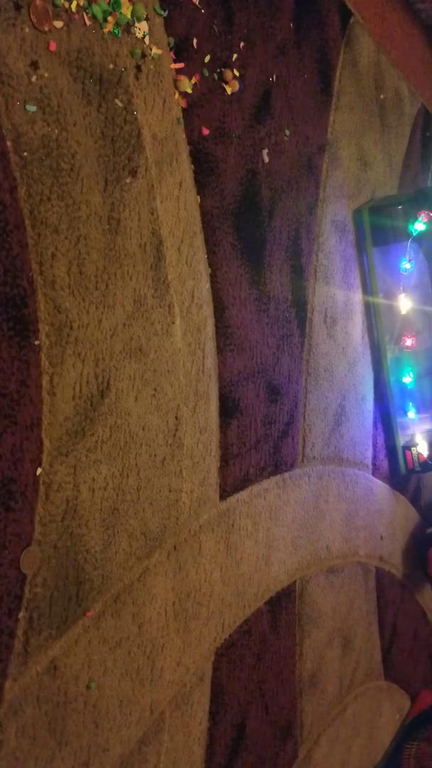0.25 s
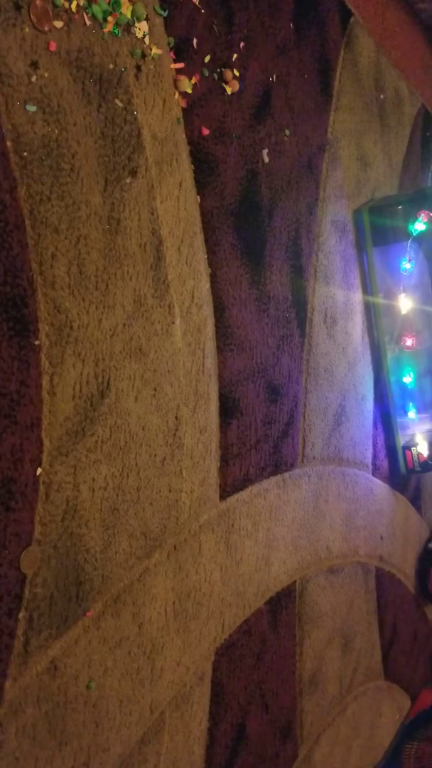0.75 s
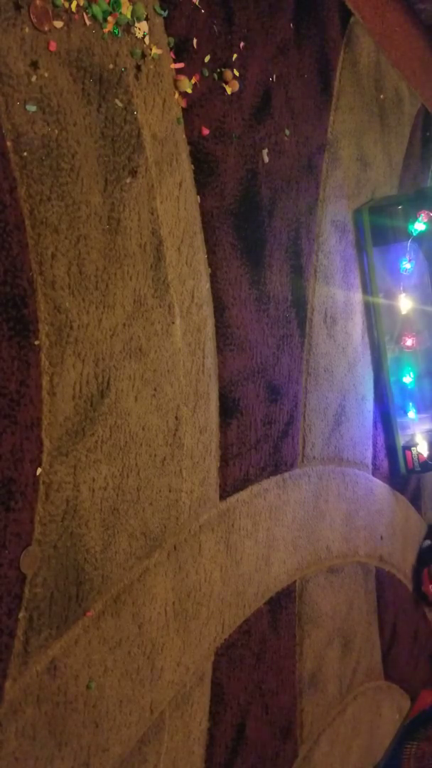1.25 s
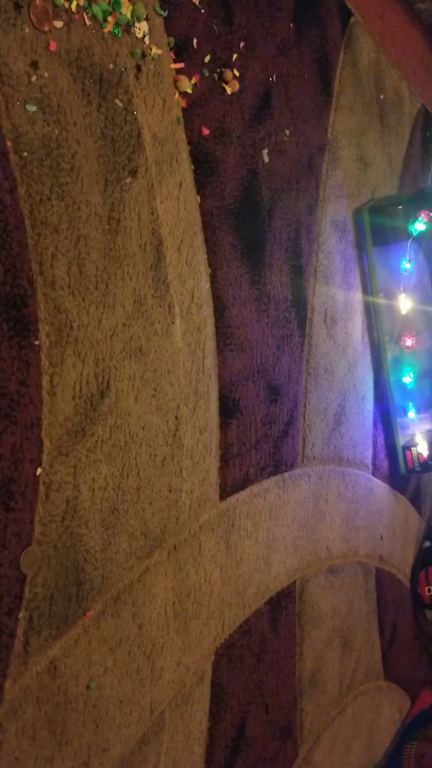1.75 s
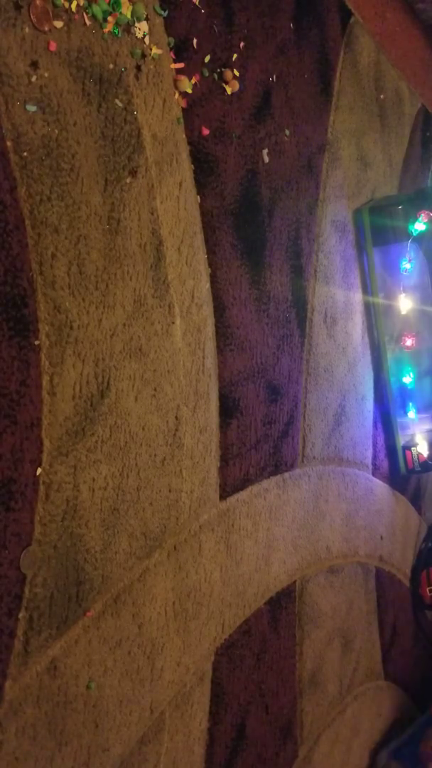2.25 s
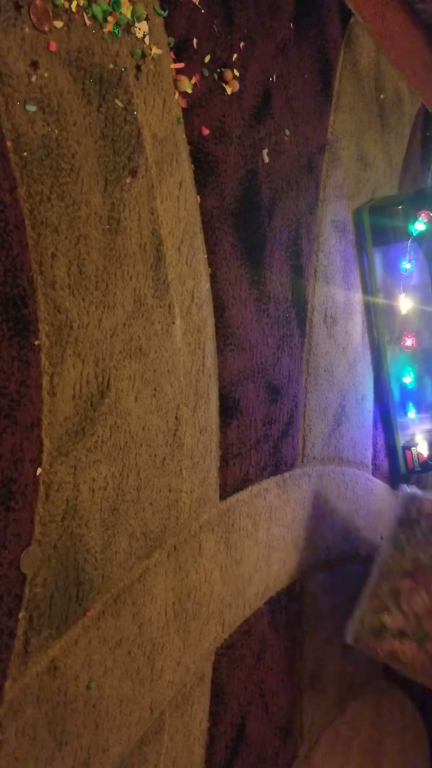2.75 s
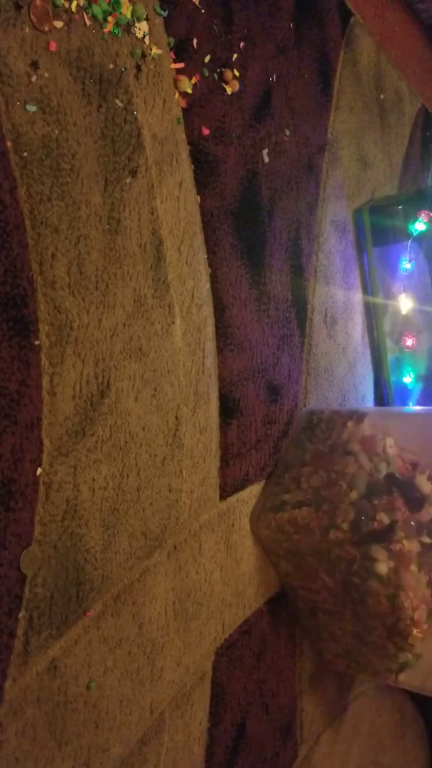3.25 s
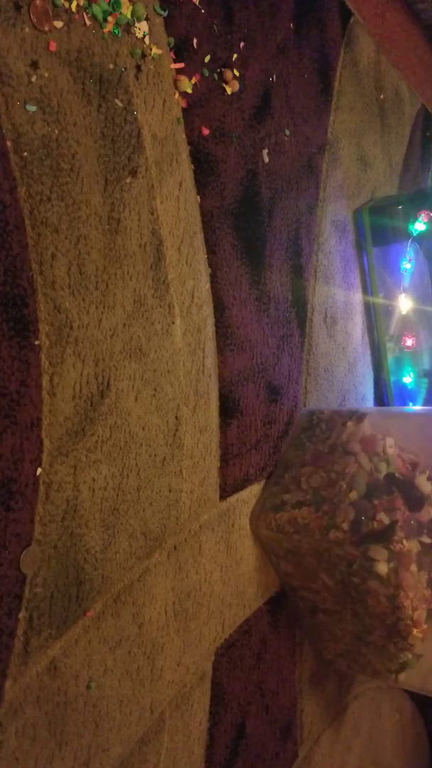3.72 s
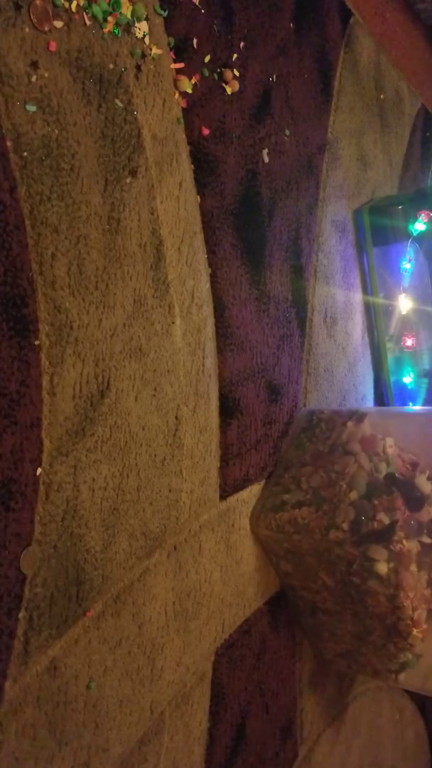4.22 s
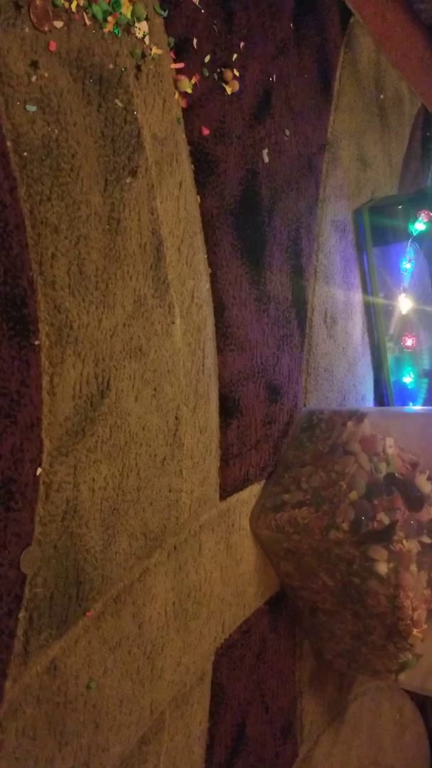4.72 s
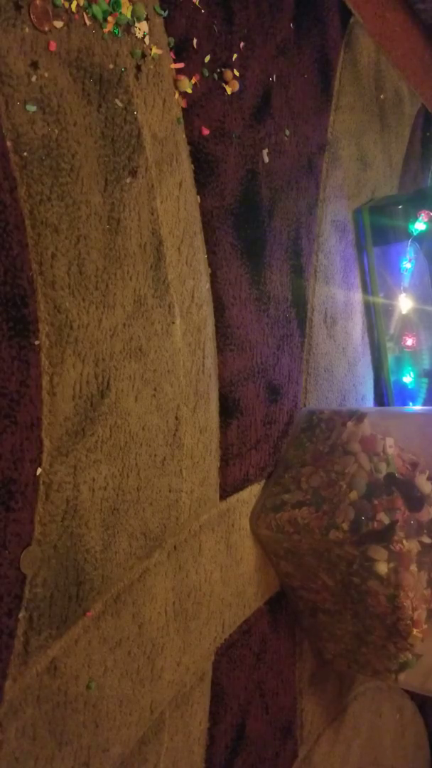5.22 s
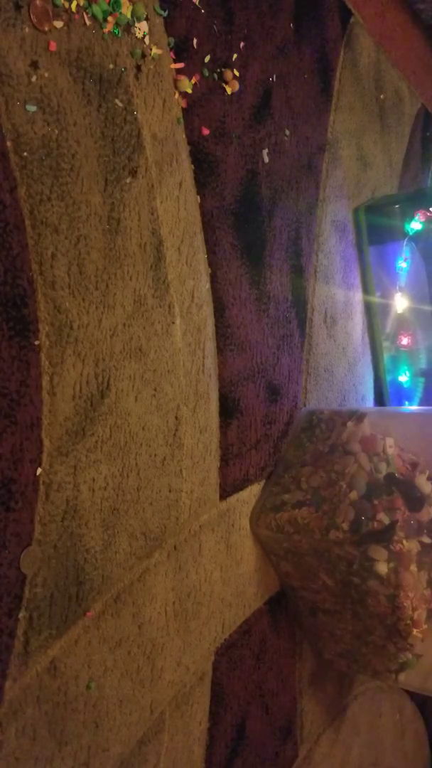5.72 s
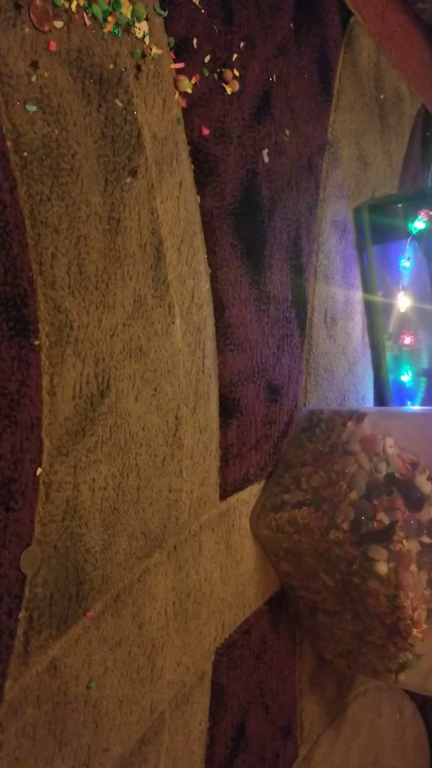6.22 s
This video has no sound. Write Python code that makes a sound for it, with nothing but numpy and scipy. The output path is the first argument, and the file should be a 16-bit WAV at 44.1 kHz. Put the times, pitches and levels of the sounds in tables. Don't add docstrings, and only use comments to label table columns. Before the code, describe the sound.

A hand vacuum has just been switched off in a small, soft room, heard closely. At 0 s a turbulent roar with hiss and a clear blade whine starts strong, then sinks in pitch and level; thinner, higher motor whines slide down with it, fading out around 3 s. Plastic knocks click at about 0.9 and 1.2 s, a dull carpet thud lands at 1.45 s, and a firmer knock comes at 2.06 s. A soft low bump at 3.07 s marks the vacuum coming to rest. Near-quiet follows, with faint low building rumble. Hollow finger taps occur at 4.3 and 4.7 s, then a sharp bright plastic clack at 5.33 s and more small taps. From 6.05 s crumbs patter and slide; from 6.18 s to the end near 6.45 s they burst into loud, dense crackles, pings and hollow knocks, with brief ringing.

```python
import sys
import numpy as np
from scipy import signal
from scipy.fft import rfft, irfft
from scipy.io import wavfile

SR = 44100
rng = np.random.default_rng(int(sys.argv[2]) if len(sys.argv) > 2 else 0)


def file_out(sig):
    cols = np.atleast_2d(sig).T
    lim = np.clip(cols, -1, 1)
    pcm = np.round(lim * 32767).astype(np.int16)
    wavfile.write(sys.argv[1], SR, pcm)


def makeup_ratio(level_db):
    decades = np.asarray(level_db, float) / 20
    return 10 ** decades


N = 285327
TIME = np.arange(N) / SR


def rms_one(x):
    return x / np.sqrt(np.mean(x ** 2) + 1e-20)


def in_time(rows):
    s, *columns = np.transpose(rows)
    return [np.interp(TIME, s, column) for column in columns]


def at_hz(points, hz):
    return np.interp(np.log(hz), np.log(np.array(points)[:, 0]), np.array(points)[:, 1])


def drift(rate):
    r = np.exp(-80 * np.pi * rate / SR)
    slow = signal.lfilter([1], [1, -2 * r, r * r], rng.standard_normal(N // 40 + 2002))
    slow = slow[2000:]
    return np.interp(np.arange(N) / 40, np.arange(len(slow)), rms_one(slow))


def coloured(spectrum):
    hz = np.maximum(np.fft.rfftfreq(N, 1 / SR), 1)
    inside = (hz > spectrum[0][0]) & (hz < spectrum[-1][0])
    noise = rfft(rng.standard_normal(N))
    return rms_one(irfft(noise * makeup_ratio(at_hz(spectrum, hz)) * inside, N))


def ring(clicks, hz, t60):
    r, w = makeup_ratio(-60 / (t60 * SR)), 2 * np.pi * hz / SR
    return signal.lfilter([0, np.sin(w)], [1, -2 * r * np.cos(w), r * r], clicks + 1e-18)


def grains(per_s, spread_db):
    sizes = makeup_ratio(spread_db * np.minimum(rng.exponential(1, N), 3.5))
    sizes = sizes * rng.choice([-1, 1], N)
    return rms_one(sizes * (rng.random(N) < per_s / SR))


# (frequency [Hz], density [dB per Hz])
RUMBLE_SPECTRUM = [(13, -62), (22, -9), (38, -6), (92, 0), (121, -8.5), (159, -8), (227, -21.5), (306, -27),
                   (382, -29), (426, -33), (737, -46.5), (801, -47), (1140, -55.5), (4510, -64.5),
                   (7000, -68.5), (9000, -64.5), (11000, -67.5), (13000, -65), (16400, -67)]
# (time [s], level [dB])
RUMBLE_COURSE = [
    (0, -41),
    (1.7, -44),
    (3.3, -37.5),
    (4.3, -36),
    (4.74, -33.5),
    (5.4, -36),
    (6.47, -34.5),
]
# (frequency [Hz], width [Hz], level against the rumble [dB])
ROOM_MODES = [(54.6, 5.2, -6.5), (91.7, 4, -4)]
# (frequency [Hz], level [dB])
FAR_HUM = [(791, -73)]


def background():
    out = coloured(RUMBLE_SPECTRUM)
    for hz, width, db in ROOM_MODES:
        mode = ring(rng.standard_normal(N), hz, 2.2 / width)
        out += makeup_ratio(db) * rms_one(mode)
    out *= makeup_ratio(in_time(RUMBLE_COURSE)[0] - 1.5 + 0.54 * drift(2.6))
    for hz, db in FAR_HUM:
        out += makeup_ratio(db + 1.2 * drift(3.0)) * np.sin(2 * np.pi * hz * TIME)
    return out


START_TURNS = 273.5
FRICTION, DRAG = 49.3, 18.8
DRAG_POWER = 1.5


def coasting():
    turns = [START_TURNS]
    for _ in range(N // 441):
        braking = FRICTION + DRAG * (turns[-1] / 100) ** DRAG_POWER
        turns.append(max(turns[-1] - braking / 100, 10))
    return np.interp(TIME, np.arange(len(turns)) / 100, turns)


# (start level [dB], loss [dB per dB of speed], extra loss [dB per dB squared])
AIR_LAWS = [
    (-35, 1.0, 0.035),
    (-23.5, 1.68, 0.03),
    (-21.5, 1.3, 0.2),
    (-36.5, 2.5, .001),
    (-63.5, 2.5, -0.1),
]
# (frequency [Hz], density [dB per Hz])
LOW_ROAR_SPECTRUM = [(82, -30), (140, -7.5), (188, -10.5), (241, -1.5), (338, -2), (372, -7.5), (430, -3),
                     (560, -21), (950, -120)]
# (frequency [Hz], density [dB per Hz])
ROAR_SPECTRUM = [(240, -29.5), (400, -17.5), (437, -4.5), (500, -2), (596, -3.5), (690, -7), (855, -15),
                 (930, -16), (981, -20), (1070, -31.5), (1180, -23), (1300, -35), (1690, -66.5),
                 (2860, -120)]
# (frequency [Hz], density [dB per Hz])
OUTLET_SPECTRUM = [(540, -30), (610, -6), (665, -1), (730, -6), (790, -21.5), (880, -24.5), (950, -15.5),
                   (1010, -24), (1100, -45.5)]
# (frequency [Hz], density [dB per Hz])
HISS_SPECTRUM = [(590, -38.5), (1000, 1.5), (1070, -7), (1170, -10), (1410, -10), (1900, -6), (2070, -18),
                 (2460, -8.5), (2840, -13.5), (4480, -24.5), (5840, -29), (6800, -46), (8840, -74),
                 (15000, -120)]
# (frequency [Hz], density [dB per Hz])
THIN_HISS_SPECTRUM = [(3820, -23), (6500, -4), (8060, -12), (15100, -24.5), (16000, -25)]
# (frequency [Hz], level [dB])
DUCT_RESPONSE = [(1100, -88), (1380, -68.5), (1480, -45.5), (1620, -40.5), (1760, -39), (1860, -29.5),
                 (1930, -38.5), (2230, -47), (2460, -31)]
# (time [s], level [dB])
BRUSH_CONTACT = [
    (0, -60),
    (.4, -77),
    (.75, -78),
    (1, -72),
    (2.2, -70),
    (2.5, -73),
    (2.75, -80),
    (2.9, -85),
    (3.03, -88),
    (3.1, -105),
]
# (order [cycles per turn], level [dB])
COMMUTATOR_ORDERS = [(24, 6.5), (36, -5), (48, 0.5), (60, -15.5), (72, -6), (84, -21), (96, -4), (108, -27),
                     (120, -8), (132, -16), (144, -8), (168, -17)]
# (frequency [Hz], level [dB])
CASING_RESPONSE = [(1500, -9), (1950, -1), (2200, 5), (2700, -1.5), (3500, -4.5), (4100, 1.5), (4400, 9),
                   (5200, 5), (5900, 3), (6300, -10.5), (6900, -17.5), (12000, -37)]
BLADES = 9
UNBALANCE_DB = -5
STOP_S = 3.3
OVERTONE_DB, OVERTONE_HZ, OVERTONE_OCTAVES = -59, 3300, 0.2


def motor():
    turns = coasting()
    slowed_db = 20 * np.log10(START_TURNS / turns)
    levels = [db - law * slowed_db - bend * slowed_db ** 2 for db, law, bend in AIR_LAWS]
    low_db, roar_db, outlet_db, hiss_db, thin_db = levels
    angle = 2 * np.pi * np.cumsum(turns) / SR

    low = coloured(LOW_ROAR_SPECTRUM) + makeup_ratio(UNBALANCE_DB) * np.sin(angle)
    roar = coloured(ROAR_SPECTRUM) + makeup_ratio(outlet_db - roar_db) * coloured(OUTLET_SPECTRUM)
    hiss = makeup_ratio(hiss_db) * coloured(HISS_SPECTRUM) + makeup_ratio(thin_db) * coloured(THIN_HISS_SPECTRUM)
    air = makeup_ratio(low_db + 1.9 * drift(17.0)) * low
    air += makeup_ratio(roar_db + 0.8 * drift(9.0)) * roar
    air += makeup_ratio(drift(9.9)) * hiss

    blade_hz = BLADES * turns
    blade_db = at_hz(DUCT_RESPONSE, blade_hz)
    blade_db = blade_db + 40 * np.log10(np.minimum(blade_hz / DUCT_RESPONSE[0][0], 1))
    overtone_db = OVERTONE_DB - (np.log2(2 * blade_hz / OVERTONE_HZ) / OVERTONE_OCTAVES) ** 2
    tones = makeup_ratio(blade_db + 2.5 * drift(28.0)) * np.sin(BLADES * angle + 0.3 * drift(40.0))
    tones += makeup_ratio(overtone_db + 3 * drift(20.0)) * np.sin(2 * BLADES * angle + 0.5 * drift(40.0))

    on = slice(int(STOP_S * SR))
    brush_db, = in_time(BRUSH_CONTACT)
    for order, db in COMMUTATOR_ORDERS:
        hz = order * turns[on]
        level_db = brush_db[on] + db + at_hz(CASING_RESPONSE, hz) + 2.5 * drift(25.0)[on]
        uneven = angle[on] + 0.012 * drift(60.0)[on]
        tones[on] += makeup_ratio(level_db) * np.sin(order * uneven) * (hz < 0.45 * SR)
    running = np.clip((STOP_S - TIME) / 0.096, 0, 1)
    return air * running, tones * running


# (frequency [Hz], t60 [s])
ROOM_DECAY = [(300, 0.3), (1000, 0.2), (3000, 0.25), (8000, 0.26), (15000, 0.32)]
ROOM_DB = -5.5


def room(x):
    t, tail = TIME[:SR // 2], 0
    edges = 150 * 2 ** np.arange(0, 7.2, 1)
    for low, high in zip(edges, edges[1:]):
        octave = signal.butter(2, [low, high], "band", fs=SR, output="sos")
        band = signal.sosfilt(octave, rng.standard_normal(len(t)))
        tail = tail + band * makeup_ratio(-60 * t / at_hz(ROOM_DECAY, np.sqrt(low * high)))
    tail = tail * np.clip((t - 0.004) / 0.0038, 0, 1)
    return makeup_ratio(ROOM_DB) * signal.fftconvolve(x, tail / np.sqrt(np.sum(tail ** 2)))[:N]


COLOUR_CORNERS = [600, 1400, 3300, 8000]


def colour(hz, hollow_db, top_db):
    hollow_share = at_hz(list(zip(COLOUR_CORNERS, [1, 0, 0, 0])), hz)
    top_share = at_hz(list(zip(COLOUR_CORNERS, [0, 0, 0, 1])), hz)
    return hollow_db * hollow_share + top_db * top_share


# (frequency [Hz], level [dB], t60 [s])
CUP_MODES = [(366.5, -9.5, 0.21), (422.5, 5, 0.024), (551, 2, 0.019), (633, -1.5, 0.044), (707, 2.5, 0.032),
             (871, 3, 0.013), (1030, -7.5, 0.019), (1199, 1, 0.012), (1340, 3.5, 0.0087),
             (1615, -15, 0.016), (1850, 2, 0.0047), (2177, -0.5, 0.0068), (2600, -1.5, 0.0073),
             (3000, -4, 0.0089), (3300, -3, 0.0056), (3700, -0.5, 0.013), (4137, 1.5, 0.014),
             (4550, -3.5, 0.024), (5300, 1, .006), (5850, 2.5, 0.0062), (6660, 2, 0.0055),
             (8400, -9, 0.002), (9120, 0, 0.0023), (9900, -6, 0.0018), (11600, -6.5, 0.0011),
             (12230, -6, 0.0018), (14300, -4.5, .0015)]
# (time [s], peak [dB], hollow body [dB], bright top [dB], pitch of spot struck [Hz])
HANDLING_KNOCKS = [(0.8824, -36, -13, -24.5, 1560), (0.9394, -44.5, 9, -12.5, 930),
                   (1.1647, -45.5, 12, -8, 900), (1.182, -33, -14, -26, 980),
                   (1.2022, -34.5, 19, -32, 1550), (1.4481, -37.5, 12, -58, 1280),
                   (1.932, -46, -11, -17, 910), (2.0601, -26.5, -1.5, -29, 934),
                   (2.0744, -32.5, -24, -18, 915), (2.2214, -37, 12.5, -48, 1610),
                   (2.8, -62, 26, -40, 1020), (3.07, -50, 11.5, -40, 1420), (3.1577, -46, 7, -44, 1340),
                   (3.1725, -40.5, -35, -30, 910), (3.3131, -58, 20, -15, 900), (3.3894, -67, 27, -13, 970)]
# (time [s], peak [dB], hollow body [dB], bright top [dB], pitch of spot [Hz])
FINGER_TAPS = [(4.269, -52.5, 16, -51, 820), (4.2756, -35, 3.5, -68, 1200), (4.419, -71, 33, -17, 1050),
               (4.444, -70, 24, -27, 950), (4.6566, -57.5, 20.5, -26, 960),
               (4.7005, -42.5, 18.5, -35, 1340), (4.7083, -33.5, 11, -23, 1540), (4.7444, -39, 7, -44, 890),
               (5.011, -41.5, 14, -48, 1275), (5.0564, -44.5, -25, -16, 3000),
               (5.1497, -58.5, 15, -37, 870), (5.298, -45, 20.5, -37, 1070), (5.3256, -13, -5, -24.5, 1030),
               (5.4194, -45.5, 14.5, -7, 970), (5.457, -38, 4.5, -21, 1090), (5.5638, -44, 5, -25, 934),
               (5.5933, -38.5, 9.5, -54, 1423), (5.681, -60, 25, -25, 1290), (5.7021, -37.5, 14, -21, 1760),
               (5.9115, -43, 16, -49, 1010), (5.9525, -21.5, 8.5, -19, 1160), (5.9974, -46, -17, -23, 1020)]
# (time [s], peak [dB], hollow body [dB], bright top [dB], pitch of spot [Hz])
CRUMB_TUMBLE = [(5.498, -64, -23, 14, 3840), (6.044, -39.5, -35, -10, 3300), (6.072, -39, -26, -8, 3900),
                (6.1055, -37.5, -6, -10, 3850), (6.1133, -30.5, -3, -21.5, 3490),
                (6.141, -37, 5, -10, 3700), (6.17, -32, -29, -2, 2600), (6.1828, -13, -5, -8.5, 3580),
                (6.193, -22, -31, -4, 1700), (6.244, -6, -17, -12.5, 1974), (6.2622, -12, -19, -32, 1720),
                (6.2916, -16.5, -2, 2.5, 3250), (6.353, -12, -20, -7, 2390), (6.369, -25, -2, -24, 2140),
                (6.4093, -27.5, 5.5, 0, 2930), (6.4197, -18, -9, -0.5, 3260),
                (6.438, -12.5, -42, -13.5, 3000), (6.4531, -20, -18, -8, 3300),
                (6.1936, -24.5, -24, 4, 3000), (6.204, -32, -20, 0, 2000), (6.276, -24, -20, -23, 4250),
                (6.342, -29, -15, 2, 3990), (6.4237, -24, -20, -5, 5510)]
PATTER_T60 = [
    0.091,
    0.1,
    0.06,
]
# (peak time [s], level [dB], swell [s], hollow body [dB], bright top [dB])
CRUMB_SLIDES = [(3.083, -30.5, 0.013, 11, -50), (3.161, -42, 0.15, 1, -34), (3.19, -45, 0.019, -8, -5.5),
                (5.851, -49.5, 0.012, 36.5, -35), (5.895, -70.5, 0.035, 5, -33),
                (5.944, -31, 0.02, 13, -34), (6.03, -61, 0.27, 1, -5.5), (6.16, -41, 0.067, -11, -4.5),
                (6.185, -14, .013, -20, -23), (6.27, -34, 0.11, -13, -2.5), (6.358, -23, 0.18, 5.5, -4),
                (6.43, -32, 0.045, -8, -2), (6.46, -20, 0.03, -6, 1)]
PATTER_SHRINK = 0.068
SLIDE_FALL_S = 0.071
WALL_CYCLES = 22.0


def cup():
    s, peak_db, hollow_db, top_db, favoured_hz = np.transpose(HANDLING_KNOCKS + FINGER_TAPS + CRUMB_TUMBLE)
    kind = np.repeat(range(3), [len(HANDLING_KNOCKS), len(FINGER_TAPS), len(CRUMB_TUMBLE)])
    at, out = np.round(s * SR).astype(int), np.zeros(N)
    slow = TIME[::32]

    patter_s = np.take(PATTER_T60, kind) * makeup_ratio(-PATTER_SHRINK * (peak_db + 31.0))
    after = slow - s[:, None]
    patter = makeup_ratio(-60 * after.clip(0) / np.clip(patter_s, 0.02, 0.5)[:, None])
    patter = patter * np.clip(after / 0.0015, 0, 1)

    peak_s, slide_db, swell, body_db, bright_db = np.transpose(CRUMB_SLIDES)
    off, swell = slow - peak_s[:, None], swell[:, None]
    stroke = makeup_ratio(-20 * np.maximum(-off / swell, off / SLIDE_FALL_S)) * (off > -2 * swell)

    crumbs = 0.9 * grains(800.0, spread_db=4.5) + grains(9000.0, spread_db=4.0)
    for k, (hz, db, t60) in enumerate(CUP_MODES):
        t60 = min(t60, WALL_CYCLES / hz)
        favour_db = 13.8 * np.exp(-(np.log2(hz / favoured_hz) / 0.14) ** 2)
        luck = rng.standard_normal((len(at), 2))
        blow = makeup_ratio(peak_db + colour(hz, hollow_db, top_db) + favour_db + 3.0 * luck[:, 0])
        shaken = makeup_ratio(-37.0) * blow @ patter
        shaken += makeup_ratio(slide_db + colour(hz, body_db, bright_db) - 45.0) @ stroke
        own_crumbs = np.roll(crumbs, 3001 * (k // 2))
        clicks = np.interp(TIME, slow, shaken) * own_crumbs * np.sqrt(0.011 / t60)
        clicks[at] += makeup_ratio(-11.5 + 2.0 * np.log2(hz / 2000)) * blow * np.sign(luck[:, 1])
        soft = signal.butter(2, min(3.4 * hz, 18000), fs=SR)
        out += makeup_ratio(db) * signal.lfilter(*soft, ring(clicks, hz, t60))
    return out


# (time [s], peak [dB], frequency [Hz])
CRUMB_PINGS = [(4.445, -60, 3000), (4.707, -51, 4800), (5.011, -57, 3300), (5.298, -41.5, 3900),
               (5.327, -10, 3620), (5.324, -10.5, 3030), (5.498, -33, 3870), (5.565, -37, 3500),
               (5.593, -31, 3670), (5.912, -41, 3900), (6.17, -36, 2600), (6.173, -37, 4100),
               (6.183, -7.5, 3140), (6.245, -3, 4100), (6.245, -6, 6140), (6.438, -9.5, 3350),
               (6.445, -22.5, 3000), (6.4535, -10, 3000), (6.422, -14, 3250), (6.423, -14, 6200),
               (6.155, -40, 6500), (6.141, -39, 7300), (6.113, -34, 3360), (6.046, -38, 3300),
               (6.194, -18, 3400), (6.367, -13, 3500)]
# (time [s], peak [dB], frequency [Hz], t60 [s])
LATCH_TONES = [(1.181, -38.5, 4360, 0.018), (2.91, -76, 3300, .15), (5.329, -25.5, 4550, 0.033),
               (5.35, -36.5, 4650, 0.04), (6.294, -28, 8400, 0.034), (6.304, -23, 8250, 0.035),
               (6.318, -30, 8200, .03), (6.292, -28, 9900, 0.03), (6.303, -27, 9950, 0.033),
               (6.316, -34, 9800, 0.03), (6.3, -21, 12880, .008)]
# (time [s], peak [dB], frequency [Hz], t60 [s])
CAVITY_BOOMS = [(3.077, -26, 51, 0.34), (4.273, -35, 1090, 0.026), (4.28, -35, 1250, 0.02),
                (4.282, -33, 580, 0.034), (4.745, -20.5, 587, 0.024), (4.746, -40, 1000, .015),
                (5.012, -42, 770, .02), (5.298, -42, 674, 0.016), (5.458, -37.5, 1090, 0.019),
                (5.593, -25, 710, 0.021), (5.703, -23.5, 610, 0.028), (5.845, -24, 348, 0.089),
                (5.954, -24, 1010, 0.029), (6.176, -21, 1440, 0.0067), (6.183, -13.5, 576, 0.024),
                (6.187, -10.5, 890, 0.02), (6.246, -7.5, 778, 0.029), (6.244, -9, 1130, .02),
                (5.013, -45, 1240, 0.046), (4.702, -44, 1450, .025), (4.717, -33, 1550, 0.025),
                (6.261, -9, 1660, 0.022), (6.308, -15, 666, 0.043), (1.204, -31, 1570, 0.027),
                (2.061, -39, 930, 0.022), (2.221, -39.5, 1620, .03), (4.709, -27, 640, .03),
                (6.368, -19, 893, 0.057), (6.388, -21, 690, .04), (6.292, -8, 715, 0.031),
                (6.352, -17, 658, 0.057), (6.409, -16.5, 637, 0.072)]
PING_CYCLES = 30.0
SPRING_S, SPRING_GAP_S, SPRING_T60_S = 1.585, 0.0385, 0.025
SPRING_HZ, SPRING_DB = 4800, -58
RATTLE_DB, RATTLE_PER_S = 4.0, 70.0


def single_parts():
    pings = [(s, db, hz, PING_CYCLES / hz) for s, db, hz in CRUMB_PINGS]
    chatter = [(SPRING_S + SPRING_GAP_S * k, SPRING_DB, SPRING_HZ, SPRING_T60_S) for k in range(5)]
    out, flutter_db = np.zeros(N), RATTLE_DB * drift(RATTLE_PER_S)
    for s, db, hz, t60 in pings + LATCH_TONES + CAVITY_BOOMS + chatter:
        i = round(s * SR)
        t = TIME[:min(SR // 4, N - i)]
        level_db = db - 60 * t / t60 + flutter_db[i:i + len(t)] * np.clip(t / 0.018, 0, 1)
        onset = np.sin(np.pi / 2 * np.clip(t * hz / 1.33, 0, 1)) ** 2
        out[i:i + len(t)] += makeup_ratio(level_db) * np.sin(2 * np.pi * hz * t) * onset
    return out


# (time [s], peak [dB], t60 [s])
CARPET_THUDS = [
    (1.45, -20.5, 0.2),
    (2.224, -38.5, 0.25),
    (3.064, -26.5, 0.36),
    (4.702, -28.5, 0.25),
    (6.288, -27.5, 0.4),
]


def thuds():
    shape = np.zeros(N)
    for s, db, t60 in CARPET_THUDS:
        fall = makeup_ratio(db - 6.0 - 60 * (TIME - s).clip(0) / t60)
        shape += fall * np.clip((TIME - s) / 0.0073, 0, 1)
    return shape * coloured([(30, -23), (55, 13.5), (110, 0.0), (250, 8.5), (500, -6.5)])


CUP_LOW_HZ = 330.0
PARTS_WET_DB = -4


def scene():
    air, whines = motor()
    parts = single_parts()
    low_cut = signal.butter(4, CUP_LOW_HZ, "high", fs=SR, output="sos")
    near = signal.sosfilt(low_cut, cup()) + whines
    reflected = room(near + makeup_ratio(PARTS_WET_DB) * parts)
    return (air + near + parts + reflected + thuds() + background())[None]


def band_limit(x):
    return signal.sosfilt(signal.butter(12, 16510, fs=SR, output="sos"), x)


def record(dry):
    x = signal.sosfilt(signal.butter(3, 40.0, "high", fs=SR, output="sos"), dry)
    x = 1.3 * np.tanh(x / 1.3)
    x = signal.sosfilt(signal.cheby2(10, 50, 16500, fs=SR, output="sos"), x)
    return band_limit(x)


dry = scene()
out = record(dry)
file_out(out)
```